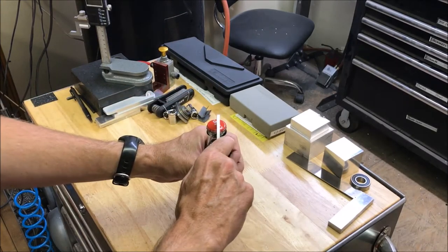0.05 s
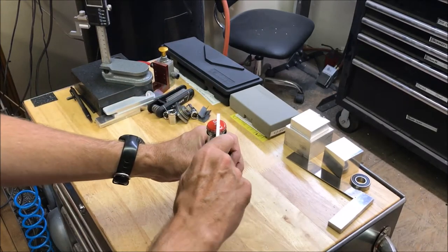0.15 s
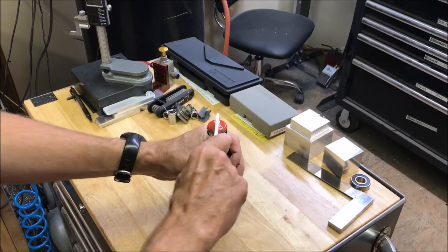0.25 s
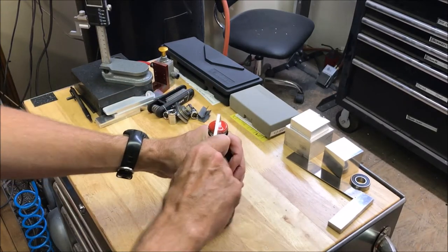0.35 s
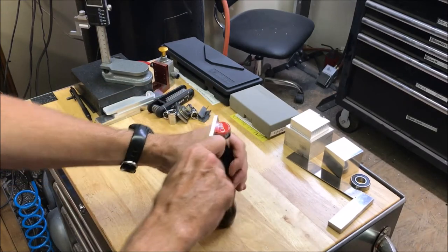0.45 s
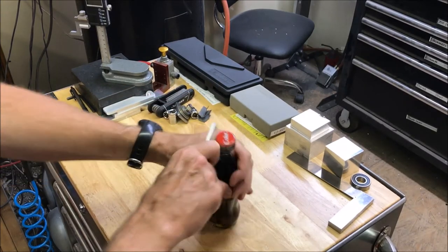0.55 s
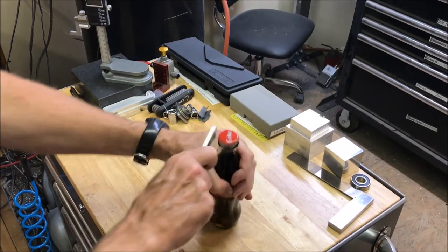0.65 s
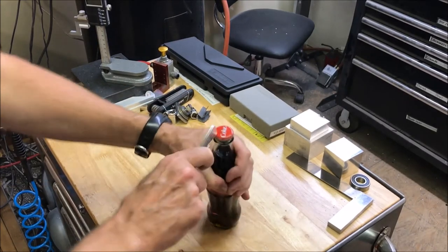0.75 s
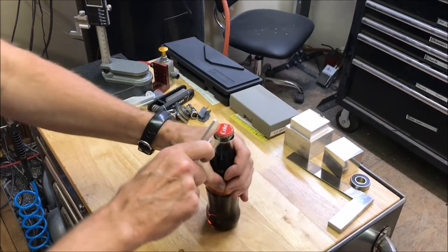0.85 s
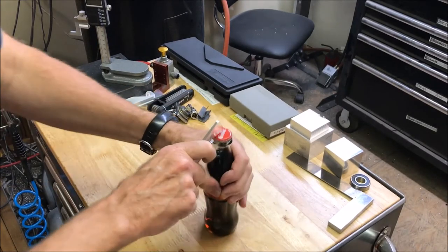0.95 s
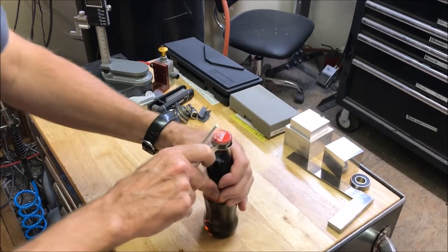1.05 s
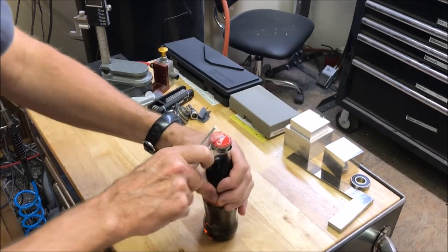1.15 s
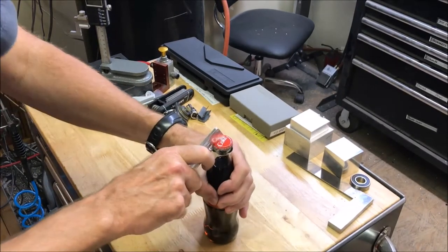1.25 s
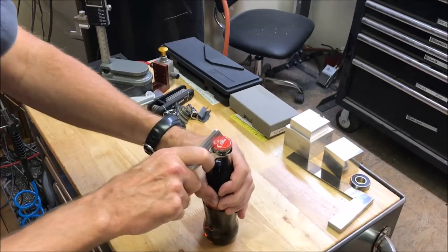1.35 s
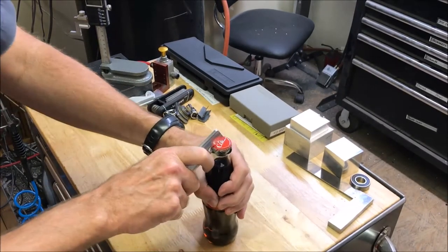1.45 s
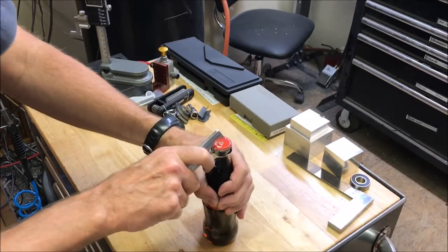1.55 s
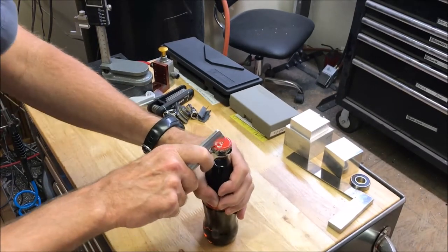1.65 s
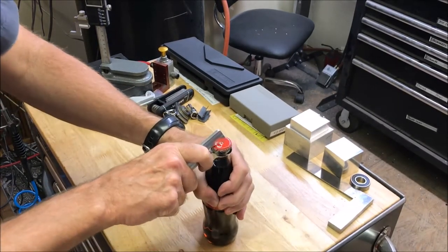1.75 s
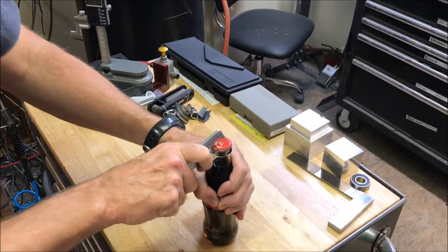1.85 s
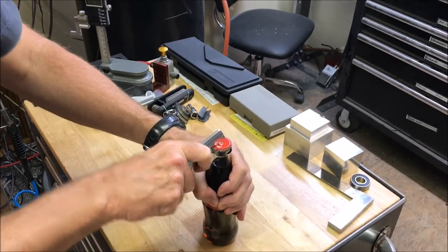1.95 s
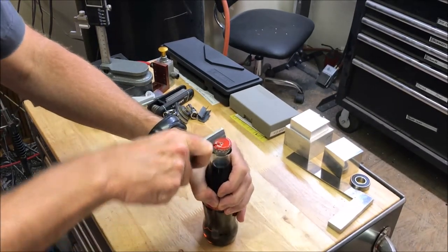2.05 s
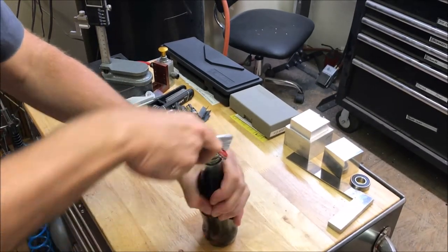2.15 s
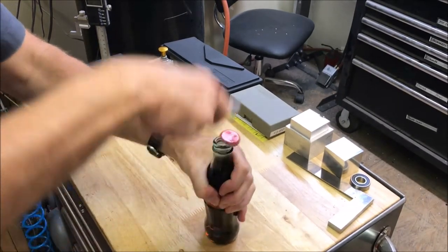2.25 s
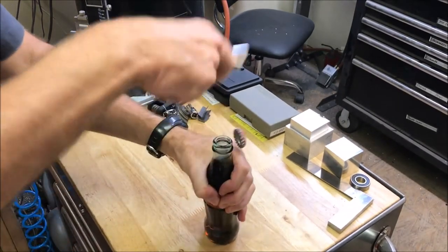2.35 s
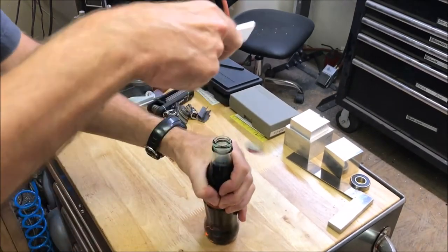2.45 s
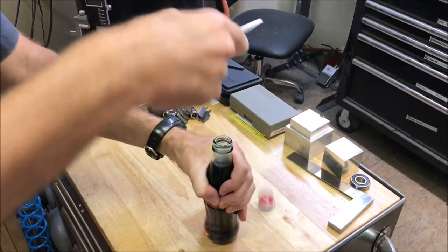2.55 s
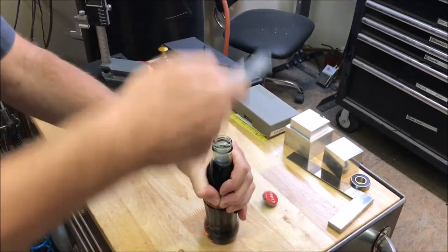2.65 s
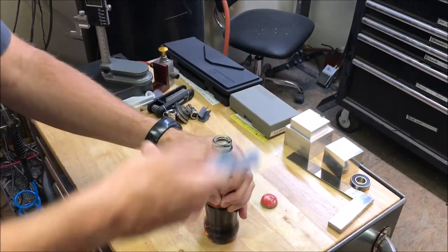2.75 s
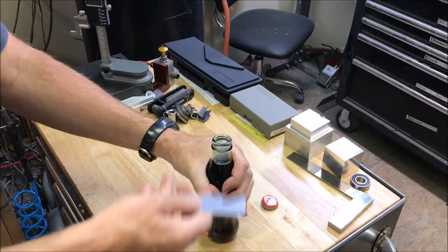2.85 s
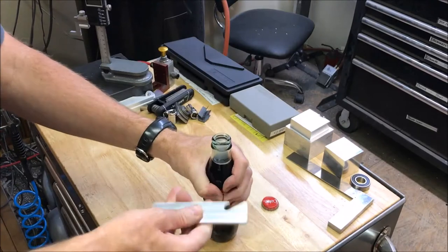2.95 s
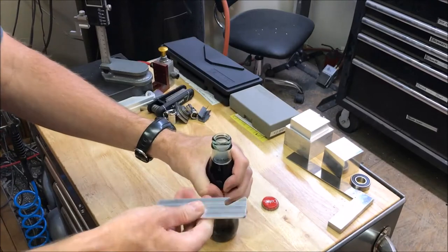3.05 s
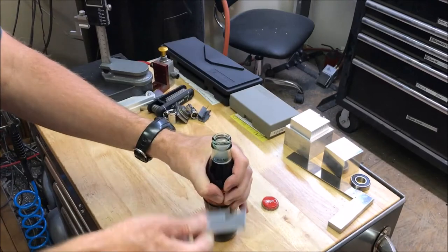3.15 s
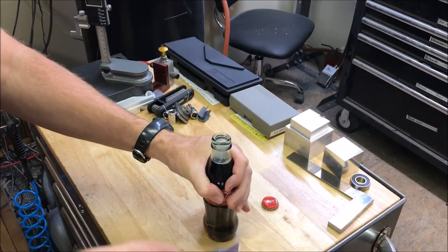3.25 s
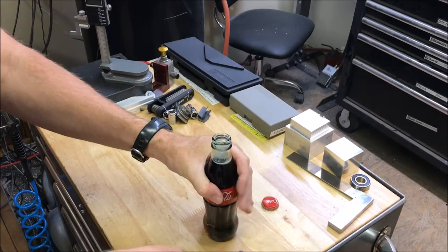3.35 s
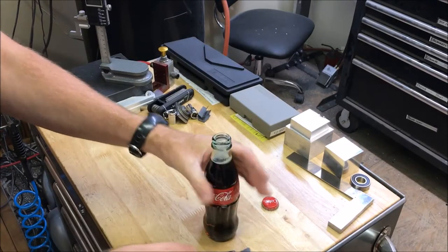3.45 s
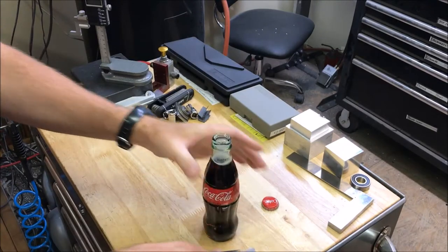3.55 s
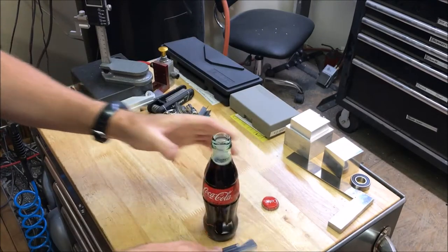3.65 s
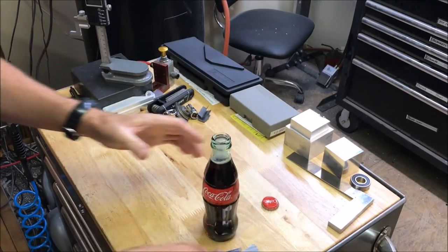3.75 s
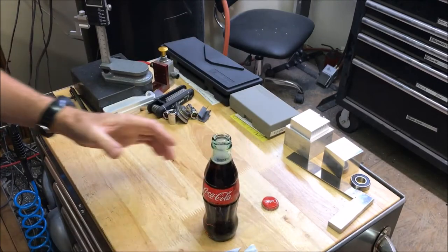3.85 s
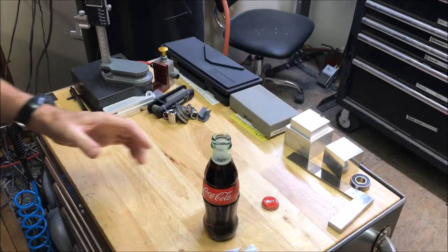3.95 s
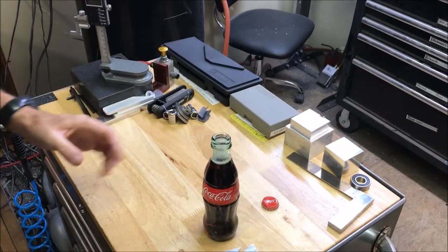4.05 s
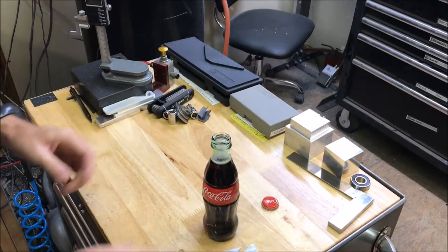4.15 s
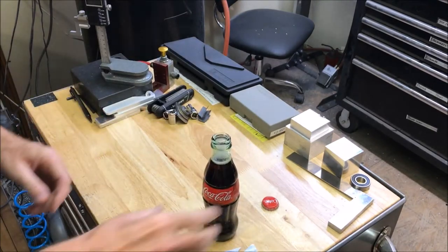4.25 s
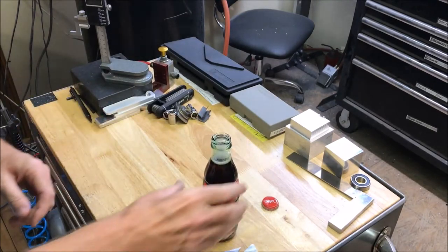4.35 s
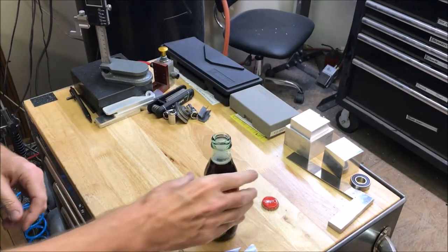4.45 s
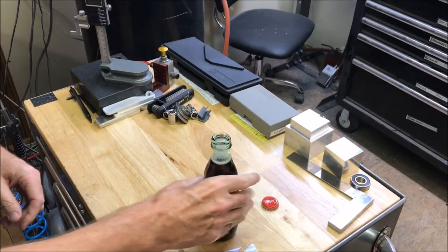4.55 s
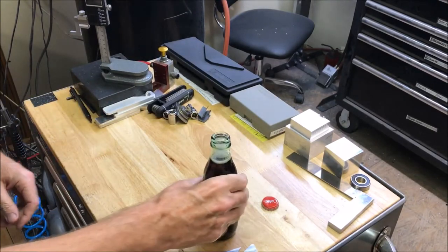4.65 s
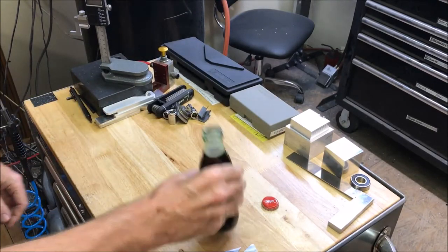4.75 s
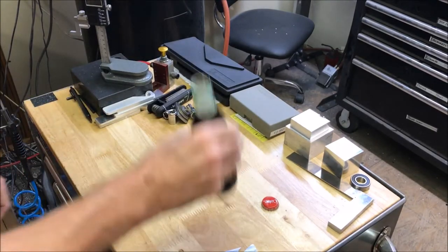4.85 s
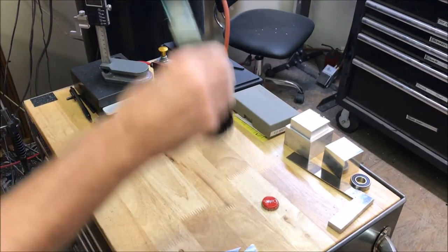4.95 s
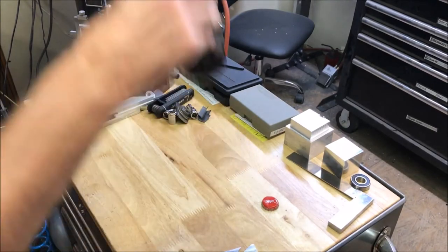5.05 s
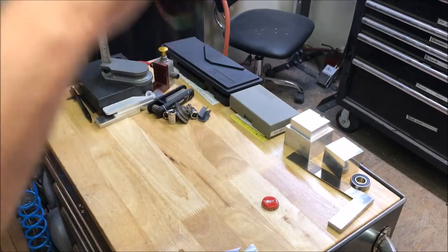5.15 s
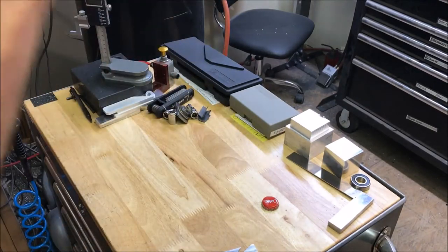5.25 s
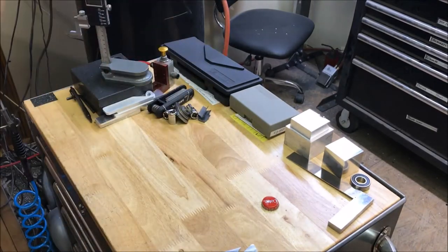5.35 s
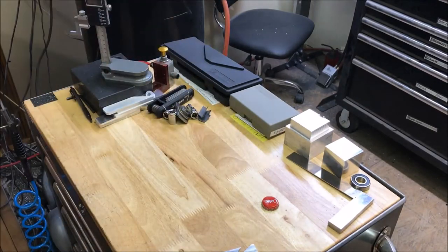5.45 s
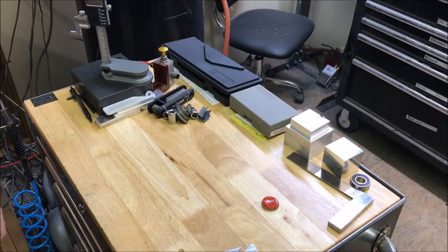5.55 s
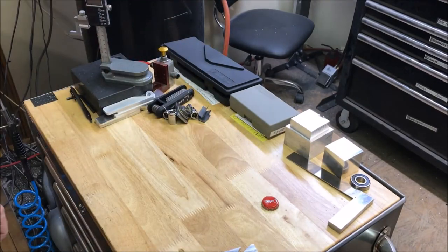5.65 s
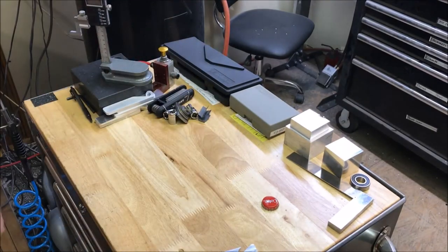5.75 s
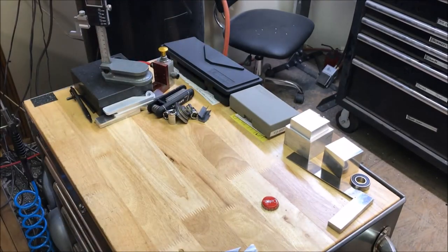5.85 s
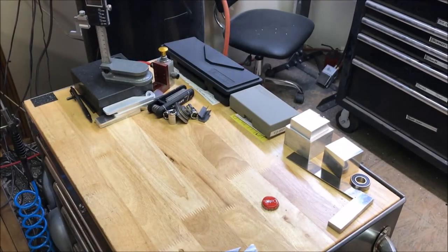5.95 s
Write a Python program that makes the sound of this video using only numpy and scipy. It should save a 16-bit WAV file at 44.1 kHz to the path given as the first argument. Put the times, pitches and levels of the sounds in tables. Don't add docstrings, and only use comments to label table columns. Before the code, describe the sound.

In a quiet workshop with a faint fan hum, a bottle cap hisses, creaks and pops off, bounces ringing on wood, then a metal opener clatters down.

```python
import sys
import numpy as np
from scipy import signal
from scipy.fft import rfft, irfft
from scipy.io import wavfile
from scipy.ndimage import uniform_filter1d

SR = 44100
rng = np.random.default_rng(int(sys.argv[2]) if len(sys.argv) > 2 else 0)


def generate_wav(sig):
    pcm = np.round(np.clip(np.atleast_2d(sig).T, -1, 1) * 32767).astype(np.int16)
    wavfile.write(sys.argv[1], SR, pcm)


def volts(x):
    e = np.asarray(x, float) / 20
    return 10 ** e


N = 264864

# frequency [Hz], density [dB per Hz].
FLOOR = [(15, -49.5), (28, -27.5), (121, -9.5), (154, -12), (251, -16), (329, -22.5), (367, -14),
         (494, -25.5), (631, -21.5), (703, -26), (763, -22.5), (3390, -36.5), (10300, -47.5),
         (15100, -46.5), (16400, -38.5)]
FLOOR_DB = -59
# frequency [Hz], density [dB per Hz].
FAN_BANDS = [(2000, -61), (2700, -15), (3200, -10), (3700, -20), (7500, -39.5), (8000, -40.5), (8300, -13),
             (8600, -24.5), (9500, -59.5)]
# pitch [Hz], level [dB rms].
HUM = [(118.4, -64), (247.6, -74.5), (360.7, -83.5), (646.0, -79), (3327, -88.5), (3521, -87), (8258, -100),
       (14503, -101), (14788, -92), (15353, -95.5), (15493, -99), (15638, -85.5)]
# centre [s], strength [dB].
PUSHES = [(.28, -62.5), (.48, -65), (.66, -56), (.79, -53), (.92, -50.5), (1.18, -53.5), (1.27, -57),
          (2.29, -64), (2.6, -62), (3.9, -62.5), (4.14, -61), (4.39, -67), (4.51, -64), (4.95, -61)]
PUSH_S, TREMOR_DB = 0.039, -68.5

# start in seconds [s], peak level [dB],
# ring of the modes [dB], lean of the ring from low to high modes [dB], and in some extra ring of the top modes [dB].
PRYING = [
    (2.1795, -24.5, 7.5, -2.5),
    (2.2165, -28, -2, 15),
    (2.2305, -22, -7, 0.5),
    (2.2745, -36, -6, 2),
]
TEARING = [
    (2.2978, -21.5, -2, -1.5, -2),
    (2.3085, -19.5, 1, -2, -9),
    (2.327, -30, 3, -13, -16),
    (2.3492, -23.5, 1, 1, -1),
]
GRAZE = [
    (2.648, -51.5, -1, -5, -5),
    (2.6693, -3, -10.5, -5.5, -4),
    (2.6737, -7.5, 0.5, -1, 1),
]
BOUNCES = [(2.7895, -30, -4.5, 1, -3.5), (2.7935, -25.5, -8.5, -8.5, -2), (2.8065, -32, -8, 5, -4),
           (2.8602, -36, -5, -8, -5), (2.867, -30.5, -9.5, -3, -2.5), (2.8735, -31.5, -7.5, 7, 8),
           (2.878, -26.5, -13, -7, 0), (2.9277, -23.5, -9, -4.5, -3), (2.938, -26, -10.5, 1, -2),
           (2.9428, -25, -8.5, 17, 18), (2.957, -28, -14.5, -15, -3), (2.9836, -13.5, -8, 9.5, 15),
           (3.000, -24.5, -11.5, -4.5, 2), (3.0144, -28.5, -13, -2, 4), (3.0314, -30.5, -18, -11, -2)]
CLATTER = [
    (3.7788, -17.5, -4, -6.5),
    (3.7883, -17.5, -7.5, -1.5),
    (3.820, -12.5, -5, -1.5),
    (3.8252, -11, -5.5, 10),
    (3.849, -25, 6.5, 0.5),
    (3.862, -28.5, -2.5, -3.5),
]
SLAP = [
    (3.8938, -3.5, -12.5, 6),
    (3.919, -26, -8, 0.5),
]
THUDS = [(.698, -38.5, 4, 3), (.714, -37.5, 13, -2), (.9235, -18, 2, -4.5), (.932, -29.5, -3, -10),
         (.950, -40, 2, -4), (2.19, -40, 0, -10), (2.238, -36.5, 1, -6), (2.3275, -17.5, 2.5, -3),
         (2.3325, -14, 8, 4.5), (2.337, -18.5, -1, 3), (2.346, -29.5, 12, 4), (2.362, -28.5, 1.5, -3),
         (3.57, -48, 7, 0), (3.583, -41, -5.5, -10), (3.6, -40, -11, -6), (3.615, -43, -3, -8),
         (3.893, -38.5, -2, -8.5), (4.518, -46, 4, -3)]
TICKS = [(.571, -45, -12, -3), (.594, -40, -12, -12), (.605, -42, -12, -6), (0.6222, -21.5, -4, -6),
         (.636, -44, -6, -8), (.652, -40, -8, -8), (0.7008, -21, -15, -2), (.799, -46, -8, -8),
         (0.8394, -54, -10, 1), (1.0885, -32, -12, -3), (1.1343, -16.5, -8, 18.5), (4.8135, -52, -12, -4),
         (4.875, -39, -12, -2), (4.889, -37, -10, -6), (4.912, -40, -12, -4.5), (4.935, -41, -6, -6),
         (5.057, -53, -10, 2), (5.1894, -54, -8, .1), (5.8144, -52, -13, 5)]
FAR_TAPS = [
    (.013, -60.5, 1, -16.5),
    (5.840, -43.5, -2, 18),
]

CAP_HELD_HZ = [1250, 2300, 3900, 6350, 8200, 9200, 11900, 13300]
CAP_TORN_HZ = [1300, 3580, 4620, 5590, 5803, 7241, 7553, 8160, 8484, 10270, 11520, 11720, 12740, 13480,
               14660, 15600]
CAP_FREE_HZ = [1900, 3520, 3731, 4205, 4522, 4700, 4905, 4995, 5054, 7273, 7560, 8490, 10200, 11520, 12720,
               13500, 14650]
OPENER_HZ = [624, 1141, 1464, 2810, 3740, 4215, 5868, 7456, 11490]
OPENER_FLAT_HZ = [1100, 2900, 4005, 4619, 5206, 6160, 6670, 7700, 8656, 11500, 12980, 15492]
BENCH_HZ = [150, 221, 312, 520, 926, 1100, 1400, 1766, 2350]
GRIT_HZ = [1930, 3200, 7700, 12500]
FAR_HZ = [1930, 3200, 3700]
# level [dB], decay time t60 [s].
CAP_HELD = [(-22, .02), (-4, .011), (-6, .013), (-3, .016), (-9, .015), (-6, .013), (-10, .013),
            (-14, .012)]
CAP_TORN = [(-8, 0.041), (-4, 0.023), (-16, 0.1815), (-5, 0.031), (-8, 0.13), (-8.5, 0.15), (-11, 0.13),
            (-13, 0.027), (-6, 0.16), (-15, 0.12), (-14, 0.091), (-2, 0.081), (-1.5, 0.12), (-7, 0.091),
            (-5, .09), (-20, .1)]
CAP_FREE = [(-15.5, 0.024), (-27.5, 0.069), (-24, 0.091), (-23.5, 0.12), (-13, 0.076), (-11.5, 0.11),
            (-11, 0.091), (-5, 0.082), (-2, 0.1625), (-21.5, 0.18), (-2.5, 0.066), (-8.5, 0.11),
            (-30.5, 0.08), (-26.5, 0.11), (-19.5, 0.15), (-27, .1), (-16.5, .11)]
OPENER = [(-14.5, 0.042), (-14, 0.031), (-13.5, 0.026), (-13.5, .02), (-8, .035), (-10.5, 0.16),
          (-23, .015), (-4, 0.015), (-29, .05)]
OPENER_FLAT = [(-11, .025), (-11, .012), (-10, .015), (-12, .015), (-10, .015), (-10, .035), (-13, .02),
               (-9, .025), (-18, .03), (-27, .07), (-19, .075), (-27, .75)]
BENCH = [(-9, .065), (0, .055), (-6, .035), (-10, .025), (-12, .03), (-8, .03), (-13, .025), (-13, .025),
         (-16, .025)]
GRIT = [(-5, 0.012), (14, .01), (12, 0.0077), (10.5, 0.0057)]
FAR = [(7, 0.047), (-2, 0.016), (-7, 0.012)]
# frequency [Hz], density [dB per Hz].
METAL_CRACK = [(240, -50), (400, -6), (1310, -14), (2470, -9), (3580, 0), (4180, -4.5), (8240, 2.5),
               (13100, -15.5), (16000, -8)]
BOUNCE_CRACK = [(180, -63), (300, -40), (1000, -29.5), (2480, -18), (3900, -5.5), (4990, -4.5), (5800, -22),
                (7690, -12), (9090, -25), (15000, -21), (16000, -39)]
OPENER_CRACK = [(180, -55), (300, -5), (645, -36.5), (828, -11), (1340, 3), (2650, 0.5), (4300, 2.5),
                (5080, -5.5), (7320, -1.5), (11000, -18), (16000, -21)]
SLAP_CRACK = [(180, -60.5), (300, -15.5), (1100, 0), (2840, 0), (3950, -3), (5000, -3.5), (6300, 2.5),
              (10000, -9.5), (13000, -5), (16000, -22)]
WOOD_CRACK = [(47, -27), (80, -8), (296, 9.5), (640, -4), (1130, -9), (1550, -14.5), (2930, -31),
              (3340, -31.5), (4000, -77), (5200, -66.5), (8800, -120)]
GRIT_CRACK = [(470, -24.5), (800, -1), (6490, -6.5), (8660, -2.5), (10800, -11.5), (12100, -2.5),
              (16000, -26.5)]
FAR_CRACK = [(880, -37), (1500, -8), (2340, -5), (3210, 4), (5600, -22), (6110, -13), (10000, -27),
             (13000, -56), (22000, -120)]
# brightness of a middling blow [dB per two octaves], gain [per dB of strength].
HARDNESS = dict(held=(-4, .01), torn=(-0.92, .01), free=(-7.5, 0.18), opener=(-7.5, 0.42),
            flat=(-15.5, 0.97), bench=(6, 0.82), grit=(0.1, 0.18), far=(-1, .01))
MIDDLING_DB = -25

# start [s], peak level [dB], pitch [Hz], t60 [s].
PINGS = [(.181, -64, 8340, .03), (.304, -63, 9100, 0.016), (.304, -70, 12500, .015), (.553, -62, 9600, .03),
         (.931, -51, 8900, .02), (1.0655, -44, 7900, .02), (1.0655, -46, 4730, .03),
         (1.337, -60, 10500, .02), (1.338, -60, 9500, 0.019), (1.416, -60, 12900, 0.019),
         (1.417, -58, 10500, .02), (1.43, -66, 11200, .03), (1.439, -66, 11900, .03),
         (2.394, -47, 11000, .015), (1.235, -44, 48, 0.21)]
# start [s], end [s], level [dB], brightness [dB per octave].
RUBS = [
    (0.513, 0.922, -62, -2),
    (3.975, 4.311, -69.5, 4),
]
# strongest at [s], rise [s], fall [s], level [dB],
# brightness [dB per octave].
STROKES = [
    (.636, 0.072, 0.046, -46, -0.5),
    (.72, 0.034, 0.067, -45, 3),
    (4.818, .012, 0.033, -58, -1.5),
    (4.915, 0.061, 0.07, -46, 1.3),
]
STROKE_SWELL_DB = 21
# time [s], level [dB], brightness [dB per octave].
DRAG = [(.922, -44, 0.5), (.935, -45.5, -0.5), (1.014, -50.5, 1), (1.06, -43.5, 0), (1.135, -41.5, 1.5),
        (1.215, -44.5, 0.5), (1.25, -46, 2.5), (1.265, -61, 0.5), (1.33, -80, 3)]
# frequency [Hz], density [dB per Hz].
SLIDE_COLOUR = [(82, -38), (140, 3), (303, 0.5), (349, -3), (644, -3), (770, -3.5), (2340, 1), (5270, -7.5),
                (7840, -11), (9000, -15.5), (13900, -22.5), (16000, -30)]
# pitch [Hz], level [dB].
THIN_TONES = [(280, -54), (501, -51), (650, -50), (2700, -48.5), (3410, -55), (3560, -51.5), (4350, -52),
              (5660, -51.5), (5830, -55), (6350, -54)]
THIN_TONES_S, THIN_TONES_LENGTH_S = .692, .042
# frequency [Hz], density [dB per Hz].
GAS_COLOUR = [(180, -56.5), (300, -20.5), (1480, -20), (1640, -19), (1840, -23), (2980, -15), (7440, -8),
              (8500, -5.5), (10700, -8.5), (13800, -2.5), (16000, -7)]
GAS_START_S, GAS_RISE_S, GAS_HOLD_S, GAS_SHUT_S, GAS_LEAK_S = 2.088, 0.011, 0.019, 0.0045, 0.056
GAS_DB, GAS_SAG_DB, GAS_SHUT_DB, GAS_FADE_DB = -23.5, 3, 19, 46.5
# time [s], pitch [Hz], level [dB].
NECK = [
    (2.178, 870, -60),
    (2.189, 942, -51.5),
    (2.212, 1244, -54),
    (2.238, 1286, -54),
    (2.262, 1250, -84),
]
# frequency [Hz], decay time t60 [s].
ROOM = [(200, 0.17), (1000, 0.17), (4000, 0.25), (14000, 0.17)]
# centre [s], thinned above [Hz], silent above [Hz], survival margin [dB].
STARVED = [(.0713, 2500, 5000, 4), (.498, 3000, 9500, 8), (.7113, 800, 6600, 5), (1.010, 3500, 7600, 3),
           (1.2233, 3500, 9000, 3), (1.2446, 500, 9000, 4), (1.3086, 1500, 6000, 5),
           (1.5646, 4000, 8500, 7), (1.9486, 4000, 8500, 7), (2.034, 4000, 8500, 7), (2.546, 4000, 8500, 7),
           (2.7806, 300, 14900, 3), (3.1006, 600, 8700, 4), (4.082, 800, 6600, 5), (4.978, 2000, 6800, 3),
           (5.341, 4000, 8500, 7), (5.746, 4000, 8500, 7)]
FRAME, SPARED_HZ, LEFT_OVER = 1600, 15000, .2


def evened(x):
    return x / np.sqrt(np.mean(x ** 2) + 1e-20)


def read(points, hz):
    f, value = np.transpose(points)
    return np.interp(np.log(hz + 1), np.log(f + 1), value)


def add(mix, s, sound):
    part = mix[max(round(s * SR), 0):][:len(sound)]
    part += sound[:len(part)]


def coloured(x, colour, tilt_db=0.):
    hz = np.fft.rfftfreq(len(x), 1 / SR)
    gain_db = read(colour, hz) + tilt_db * np.log2((hz + 100) / 3000)
    return irfft(rfft(x) * volts(gain_db), len(x))


def leaning():
    t = np.arange(N) / SR
    return volts(TREMOR_DB) + sum(volts(db) * np.exp(-((t - s) / PUSH_S) ** 2) for s, db in PUSHES)


def floor():
    t = np.arange(N) / SR
    air = volts(FLOOR_DB - 4) * evened(coloured(rng.standard_normal(N), FLOOR))
    air += volts(-82.5) * evened(coloured(rng.standard_normal(N), FAN_BANDS))
    for hz, db in HUM:
        waver = evened(uniform_filter1d(uniform_filter1d(rng.standard_normal(N), 3000), 3000))
        drift = (2.523 + 0.0012 * hz) * np.cumsum(waver) / SR
        air += volts(db + 3.0 + 1.5 * waver) * np.sin(2 * np.pi * (hz * t + drift))
    shake = coloured(rng.standard_normal(N), [(25, -56), (45, -9.0), (65, -0.5), (95, -5.5), (160, -42.5), (400, -97.0)])
    return air + leaning() * evened(shake)


def strikes(events, hardness, modes_hz, modes, crack, anchors, crack_s, beat_hz, beat_depth, grip_db):
    hz = np.array(modes_hz)[:, None]
    db, t60 = np.transpose(modes)[..., None]
    out = np.zeros(N)
    t = np.arange(0, np.clip(t60.max(), .12, .45), 1 / SR)
    short = t60 < 1 / 2
    chance = rng.random((len(events), 3, len(modes), 1))
    for (s, peak_db, mid_db, lean_db, *top_db), (phase, rate, lag) in zip(events, chance):
        ring_db = [mid_db - lean_db, mid_db, mid_db + lean_db]
        ring_db.append(ring_db[0] + sum(top_db))
        tilt_db = hardness[0] + hardness[1] * (peak_db - MIDDLING_DB)
        level_db = db + read(list(zip(anchors, ring_db)), hz) - 60 * t / np.maximum(t60, .005)
        level_db += grip_db * np.exp(-t / 0.0086) * short
        throb = 1 + beat_depth * np.cos(2 * np.pi * (beat_hz * (.5 + rate) * t + lag))
        flutter = uniform_filter1d(rng.standard_normal(throb.shape), size=300, axis=1)
        throb = throb * (1 + .35 * evened(flutter) * short)
        ring = (volts(level_db) * throb * np.sin(2 * np.pi * (hz * t + phase))).sum(0)
        ring *= np.minimum(t * hz.min() + 1e-3, 1) / np.linalg.norm(volts(db))
        burst = evened(coloured(rng.standard_normal(len(t)), crack, tilt_db / 2)) * np.exp(-t / crack_s)
        onset = np.minimum(t / (0.31 * crack_s), 1)
        add(out, s, volts(peak_db - 10.5) * (burst * onset + ring))
    return out


def far_taps():
    return strikes(FAR_TAPS, HARDNESS["far"], FAR_HZ, FAR, FAR_CRACK, (1930, 3200, 3700), 0.015, 100.0, 0.42, 2.8)


def ping(db, hz, t60):
    t = np.arange(0, t60, 1 / SR)
    return volts(db - 60 * t / t60) * np.minimum(t / (0.06 * t60), 1) * np.sin(2 * np.pi * hz * t)


def patchy(x, depth_db):
    z = signal.stft(x, nperseg=256, noverlap=192)[2]
    patches = uniform_filter1d(rng.standard_normal(z.shape), size=4, axis=0)
    patches = uniform_filter1d(patches, size=18, axis=1)
    return signal.istft(z * volts(depth_db * evened(patches)), nperseg=256, noverlap=192)[1][:len(x)]


def rush(rows, colour, grain_db, grains_per_s, patchy_db):
    s, level_db, tilt_db = np.transpose(rows)
    t = np.arange(s[0], s[-1], 1 / SR)
    slips = volts(grain_db * np.minimum(rng.exponential(1, len(t)), 3.5))
    slips *= rng.random(len(t)) < grains_per_s / SR
    drive = rng.standard_normal(len(t)) * (slips + 0.15)
    drive *= volts(1.2 * evened(uniform_filter1d(rng.standard_normal(len(t)), 250)))
    drive = patchy(drive, patchy_db)
    dull, plain, bright = (evened(coloured(drive, colour, tilt)) for tilt in (-4, 0, 4))
    share = np.clip(.5 + np.interp(t, s, tilt_db) / 8, 0, 1)
    mixed = np.maximum(1 - 2 * share, 0) * dull
    mixed += (1 - abs(1 - 2 * share)) * plain
    mixed += np.maximum(2 * share - 1, 0) * bright
    return s[0], volts(np.interp(t, s, level_db)) * mixed * signal.windows.tukey(len(t), .015)


def rub(start, end, db, tilt_db):
    return [(start, db, tilt_db), (end, db, tilt_db)]


def stroke(s, rise_s, fall_s, level_db, tilt_db):
    along = np.arange(-4, 5) / 4
    times = s + along * np.where(along < 0, rise_s, fall_s)
    return np.transpose([times, level_db - STROKE_SWELL_DB * along ** 2, tilt_db + 0 * along])


def ticks():
    return strikes(TICKS, HARDNESS["grit"], GRIT_HZ, GRIT, GRIT_CRACK, (2000, 3200, 7700), 0.0029, 150., 0.16, 0.88)


def thin_tones():
    t = np.arange(0, THIN_TONES_LENGTH_S, 1 / SR)
    hz, db = np.transpose(THIN_TONES)[..., None]
    lines = volts(db) * np.sin(2 * np.pi * (hz * t + rng.random(hz.shape)))
    return THIN_TONES_S, lines.sum(0) * np.sin(np.pi * t / THIN_TONES_LENGTH_S)


def thuds():
    return strikes(THUDS, HARDNESS["bench"], BENCH_HZ, BENCH, WOOD_CRACK, (220, 500, 1200), .006, 40., 0.235, 1.7)


def gas():
    s = GAS_START_S + np.cumsum([0, GAS_RISE_S, GAS_HOLD_S, GAS_SHUT_S, GAS_LEAK_S])
    level_db = GAS_DB - np.array([40, 0, GAS_SAG_DB, GAS_SHUT_DB, GAS_FADE_DB])
    return rush(np.transpose([s, level_db, 0 * s + .4]), GAS_COLOUR, .4, 24000, 1.3)


def neck():
    s, hz, level_db = np.transpose(NECK)
    t = np.arange(s[0], s[-1], 1 / SR)
    fuzz = 1 + 0.67 * evened(uniform_filter1d(rng.standard_normal(len(t)), size=200))
    phase = 2 * np.pi * np.cumsum(np.interp(t, s, hz)) / SR
    return s[0], volts(np.interp(t, s, level_db)) * fuzz * np.sin(phase)


def prying():
    return strikes(PRYING, HARDNESS["held"], CAP_HELD_HZ, CAP_HELD, METAL_CRACK, (2400, 6400, 12000),
                   0.0038, 100.0, 0.48, 7.2)


def tearing():
    return strikes(TEARING, HARDNESS["torn"], CAP_TORN_HZ, CAP_TORN, METAL_CRACK, (3600, 7300, 10300, 12500),
                   0.0067, 61.0, 1.0, 4.)


def bounces():
    return strikes(GRAZE + list(BOUNCES), HARDNESS["free"], CAP_FREE_HZ, CAP_FREE, BOUNCE_CRACK,
                   (5107, 7740, 8500, 10000), 0.0034, 45., .4, 8.)


def clatter():
    return strikes(CLATTER, HARDNESS["opener"], OPENER_HZ, OPENER, OPENER_CRACK, (1500, 4200, 7500),
                   0.0034, 60., 0.1, 3.6)


def slap():
    return strikes(SLAP, HARDNESS["flat"], OPENER_FLAT_HZ, OPENER_FLAT, SLAP_CRACK, (4000, 7000, 14000),
                   0.0021, 25., .08, 20.5)


def room(x):
    out = np.zeros(N)
    turn = 2 * np.pi * 2.5 * np.arange(N) / SR
    for k in range(3):
        taps = rng.standard_normal(SR // 2) * (np.arange(SR // 2) > 120)
        hz, t, z = signal.stft(taps, SR, nperseg=128)
        tail = signal.istft(z * volts(-60 * t / read(ROOM, hz)[:, None]), SR, nperseg=128)[1]
        window = np.sqrt(2 / 3) * np.cos(turn + k * np.pi / 3)
        out += signal.oaconvolve(x * window, tail / np.linalg.norm(tail))[:N]
    return out


def scene():
    near = far_taps() + ticks() + thuds() + prying() + tearing() + bounces() + clatter() + slap()
    for s, *mode in PINGS:
        add(near, s, ping(*mode))
    for rows in [rub(*row) for row in RUBS] + [stroke(*row) for row in STROKES] + [DRAG]:
        add(near, *rush(rows, SLIDE_COLOUR, 1.2, 9000, 3.))
    add(near, *thin_tones())
    add(near, *gas())
    add(near, *neck())
    tail = coloured(room(near), [(200, 1), (900, 3.0), (3000, -2.0), (15000, -4.0)])
    return (near + volts(-4.5) * tail + floor())[None]


def starve(x):
    out = x.copy()
    hz = np.fft.rfftfreq(FRAME, 1 / SR)
    for s, thin_hz, silent_hz, margin_db in STARVED:
        at = round(s * SR) - FRAME // 2
        z = rfft(x[at:at + FRAME] * np.hanning(FRAME))
        usual = np.sqrt(uniform_filter1d(abs(z) ** 2, size=60))
        strong = uniform_filter1d(1. * (abs(z) > volts(margin_db) * usual), size=3) > .1
        thinned = np.maximum(1.3 * strong * (hz < silent_hz), LEFT_OVER)
        kept = np.where((hz < thin_hz) | (hz > SPARED_HZ), 1, thinned)
        out[at:at + FRAME] += irfft(z * (kept - 1), FRAME)
    return out


def roll_off(x):
    return signal.sosfilt(signal.butter(12, 16510, fs=SR, output="sos"), x)


def record(dry):
    limited = signal.oaconvolve(dry, signal.firwin(255, 16000, fs=SR)[None], "same")
    mix = starve(limited[0])[None]
    return roll_off(mix)


dry = scene()
out = record(dry)
generate_wav(out)
```